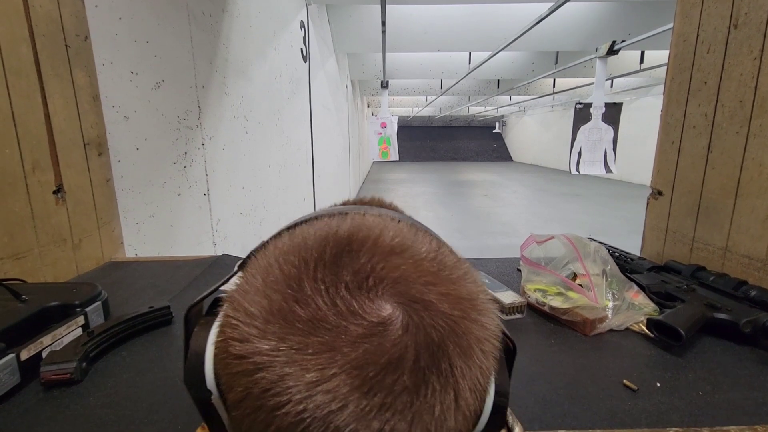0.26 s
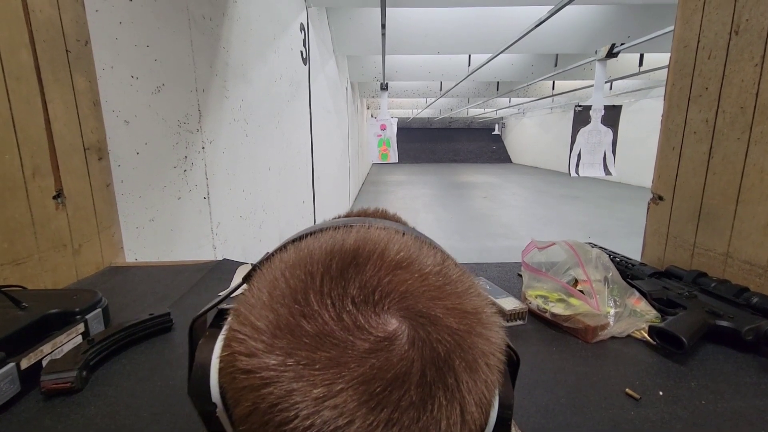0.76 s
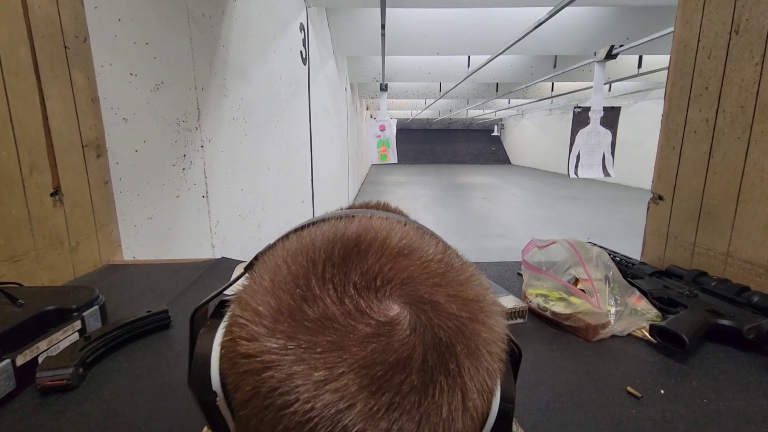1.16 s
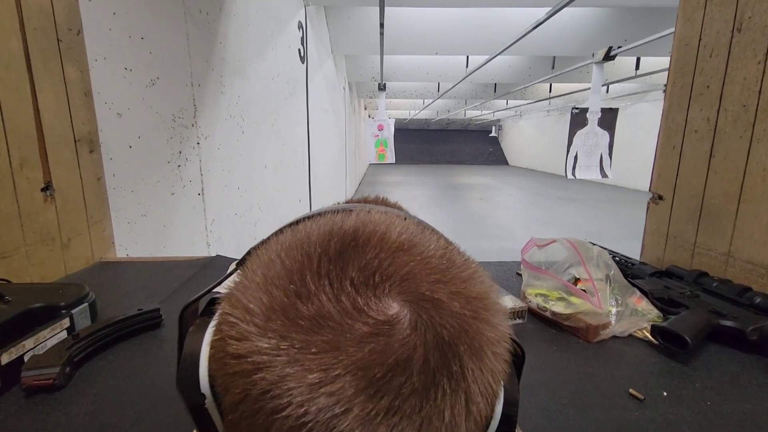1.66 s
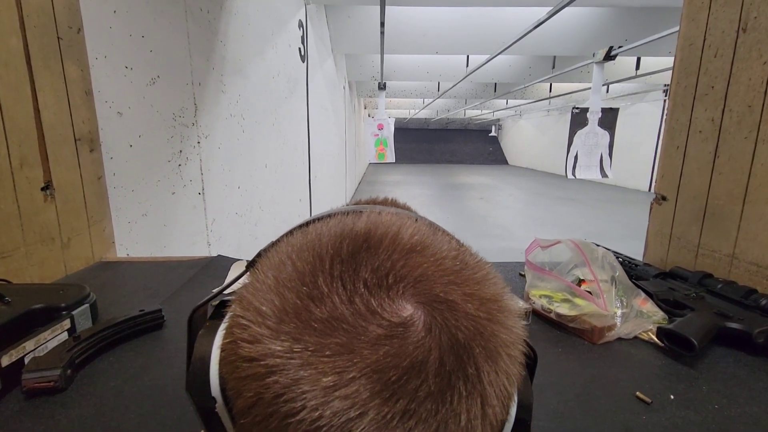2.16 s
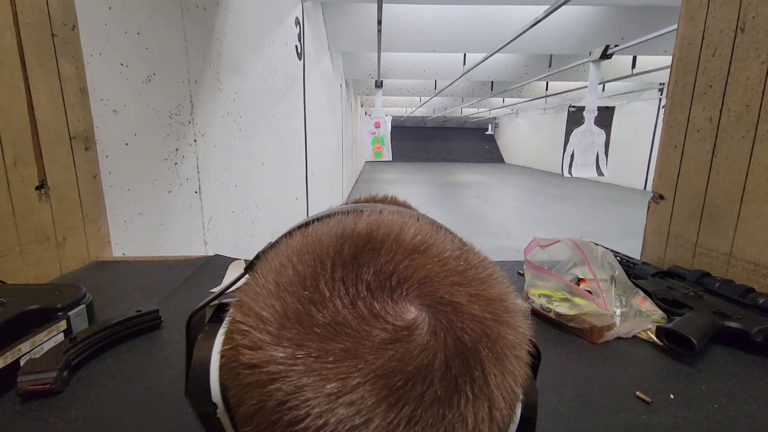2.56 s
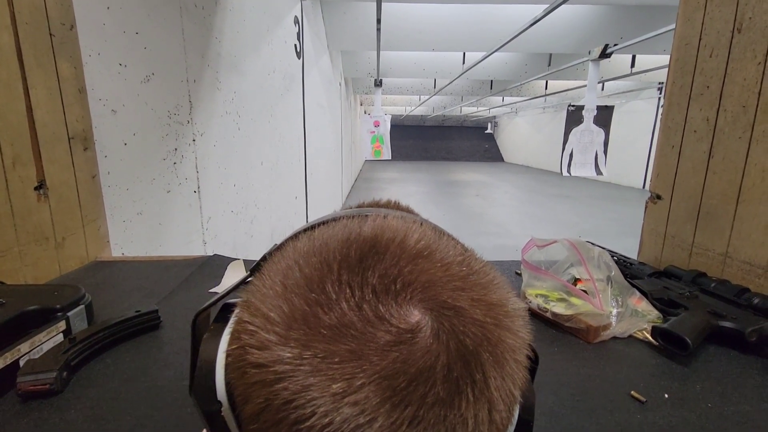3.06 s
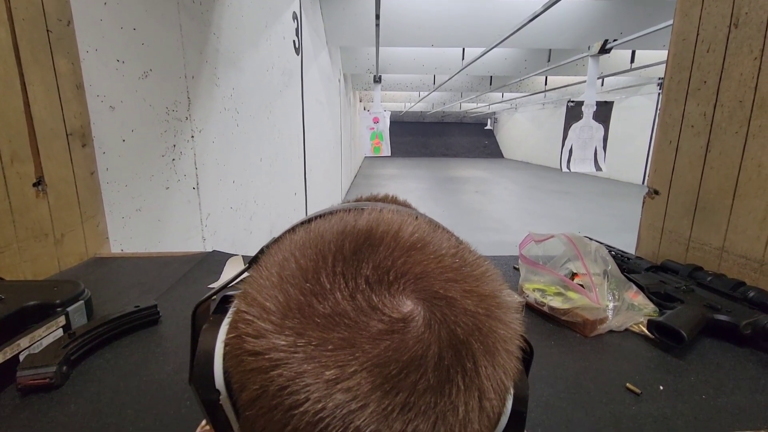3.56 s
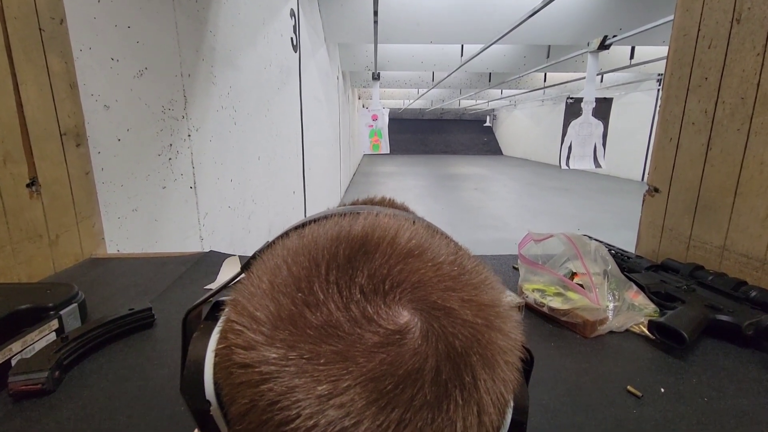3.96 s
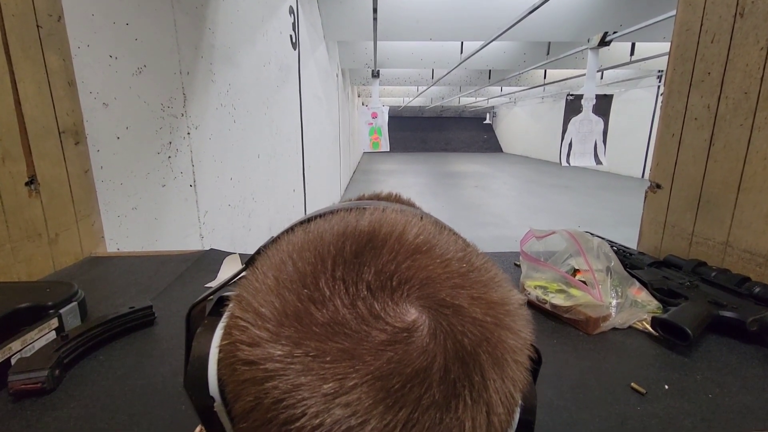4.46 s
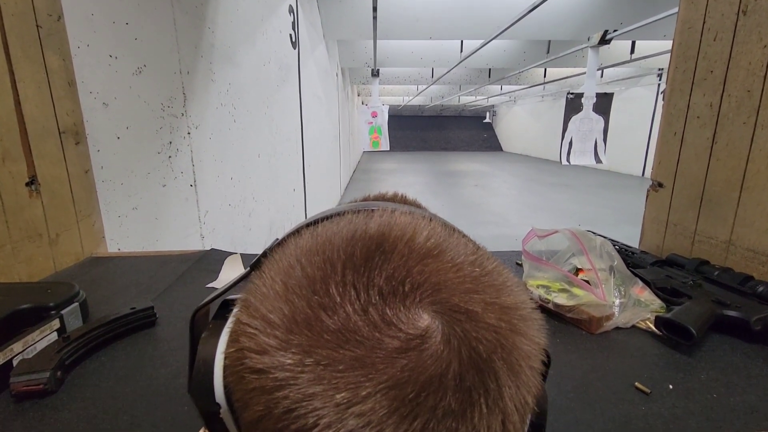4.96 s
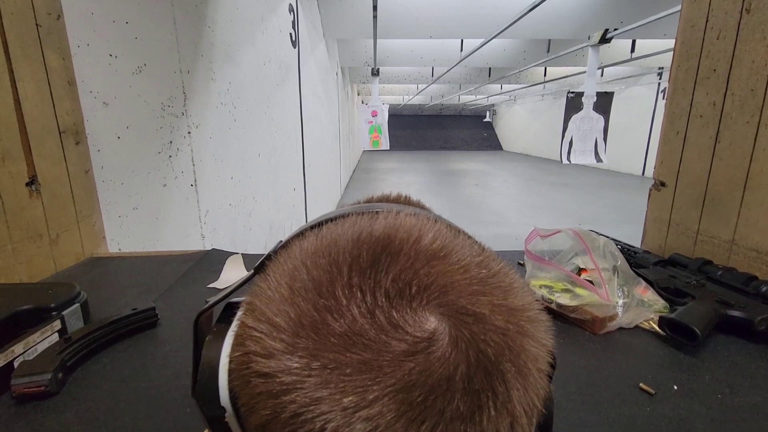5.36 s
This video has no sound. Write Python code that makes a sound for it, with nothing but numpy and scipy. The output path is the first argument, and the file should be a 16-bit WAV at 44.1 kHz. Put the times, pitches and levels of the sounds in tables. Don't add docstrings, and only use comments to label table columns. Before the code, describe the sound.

Over a fading blast's reverberation and steady fan rumble, three more gunshots thunder from neighbouring lanes, then light spent casings clink on a bench.

```python
import sys
import numpy as np
from scipy import signal
from scipy.fft import rfft, irfft, next_fast_len
from scipy.io import wavfile
from scipy.ndimage import uniform_filter1d, map_coordinates

SR = 44100
rng = np.random.default_rng(int(sys.argv[2]) if len(sys.argv) > 2 else 0)


def output_pcm(signal):
    pcm = np.clip(np.atleast_2d(signal).T, -1, 1) * 32767
    wavfile.write(sys.argv[1], SR, np.round(pcm).astype(np.int16))


def gain_from_db(level_db):
    decades = np.asarray(level_db, float) / 20
    return 10 ** decades


N = 247533
t = np.arange(N) / SR

# t/s, blast level/dB, room mode drive/dB, baffle drive/dB, near lane [bool]
SHOTS = [
    (-.412, 5, 1.6, -1.5, True),
    (2.61, 10, 1, 1.6, False),
    (4.267, 9, -1.5, -4.5, False),
    (4.648, 2.36, -0.5, -4.8, True),
]
# f/Hz, density/dB per Hz
BLAST_SPECTRUM = [(53, -49), (90, -7.5), (114, -8.5), (158, -5.5), (223, -5), (374, -2), (714, -4),
                  (1810, -9), (2010, -12), (7670, -23), (11100, -25), (14000, -18), (15600, -16)]
# f/Hz, t60/s
HALL_T60 = [(120, 0.66), (300, 0.87), (1000, 0.74), (3000, 0.68), (5000, 0.67), (8000, 0.69), (12000, 0.5),
            (15000, 0.35)]
# f/Hz, density/dB per Hz
LATE_SPECTRUM = [(76, -50.5), (130, -5), (282, -15.5), (365, -6), (403, -8), (446, -10.5), (566, -3),
                 (858, -7.5), (1250, -8.5), (6380, -19.5), (10300, -53), (12500, -40), (15000, -72)]
# f/Hz, t60/s
LANES_T60 = [(150, 0.65), (500, 4.09), (1500, 3.3), (3000, 2.23), (5000, 1.785), (8000, 1.28), (13000, .8)]
RISE_S = (0.043, 0.0094)
HIGHS_SLOWER = 1.77
FILL_S = (0.16, 0.085)
BLOOM_DB = (-2, -1)
LATE_DB = (-31, -32.5)
BRIGHT_DB = (1.7, 4)
BAND_DB = (1.5, 5)
# t/s, level/dB, width/s, signed scale
THUMPS = [
    (2.642, -12, 0.0066, 1),
    (2.6432, -19, 0.00091, -1),
    (4.297, -12.5, 0.0049, 1),
    (4.2982, -11, 0.0002, -0.87),
    (4.2991, -4, 0.00053, -1),
    (4.65, -13.5, 0.0061, 0.67),
]
# f/Hz, level/dB
PARTITION = [(620, -5), (860, -6.5), (1400, -5), (2300, -7.5), (5000, -13.5)]
# f/Hz, t60/s, level/dB from far lane, from near lane, from the shot already ringing
ROOM_MODES = [(42, 2.2, -19.5, -33, -31), (61.8, 2.34, -9, -6.5, -16.5), (77.3, 3.4, -8, -21, -20),
              (88.3, 3.09, -11, -18, -26.5), (153.5, 0.95, -9.5, -14.5, -16),
              (177.2, 0.97, -17, -36.5, -36)]
LEAD_S = 0.0003
# f/Hz, t60/s, level/dB from far lane, from near lane
BAFFLES = [(273.3, 1.38, 13.5, 14.5), (327.7, 1.5, 13, 20.5), (345.3, 1.2, 6, 18), (381, 2.8, 2.5, -17.5),
           (538, 3.6, 2, -1.5), (563, 3.76, -3, -0.5), (623, 7.8, -11.5, -11.5), (803, 5, -3, -4.5),
           (940, 1.6, -11, -5), (1080, 5.9, -7, -11.5), (1323, 4.93, -9, -5), (1330, 5.7, -11, -25.5)]
# t/s, scatter level/dB, ring level/dB, bench knock level/dB
CASES = [
    (1.172, -95, -99, -69),
    (3.365, -76.5, -66, -86.5),
    (5.389, -50, -45.5, -61),
    (5.502, -51, -45, -51),
    (5.525, -45.5, -49, -49.5),
]
# delay/s, scatter and knock loss/dB, ring loss/dB
RATTLE = [
    (0, -7.5, 17),
    (.006, 5.5, -3),
    (.017, 12, 12),
]
# f/Hz, level/dB, t60/s
BRASS = [(12320, -5.5, 0.38), (12380, 1, 0.28), (5760, 4.5, .03), (14000, -6, .03)]
# f/Hz, width/Hz, level/dB
BENCH = [(1700, 900, 10), (2900, 800, 22.5), (4380, 1200, 5), (5700, 730, -18)]
# f/Hz, density/dB per Hz
AIR_SPECTRUM = [(12, -27.5), (20, -8.5), (74, -2.5), (98, -7.5), (157, -13.5), (181, -24.5), (334, -22.5),
                (454, -30), (634, -23.5), (689, -30.5), (963, -32.5), (2860, -39.5), (10900, -63),
                (13600, -49), (15700, -58)]
# f/Hz, level/dB
FAN_TONES = [(532.9, -61), (624.5, -64), (753.7, -69.5), (1061, -90.5), (1330, -92)]
# f/Hz, level/dB
WHINE = [(12800, -89), (13280, -88.5), (14400, -94)]
FLICKER_HZ = 120
# f/Hz, left-right correlation [-1..1, negative = opposed]
ALIKE = [(60, .82), (130, .5), (420, .5), (650, -.1), (1100, -.45), (1700, -.35), (2700, -.05), (6000, 0),
         (7500, .25), (12000, .2)]
# f/Hz, left minus right/dB
LEAN = [(100, 1), (1200, -.4), (2200, -3.4), (5500, -4.2), (7500, 0)]


def unit(x):
    return x / np.sqrt(np.mean(x ** 2) + 1e-20)


def along(points, hz):
    f, v = np.transpose(points)
    return np.interp(np.log(hz + 1), np.log(f + 1), v)


def filtered(x, response):
    m = next_fast_len(N + SR // 2)
    return irfft(rfft(x, m) * response(np.fft.rfftfreq(m, 1 / SR)), m)[..., :N]


def wobble(rate_hz):
    return map_coordinates(rng.standard_normal(int(N * rate_hz / SR) + 4), [t * rate_hz])


def port_angle(hz):
    return np.arccos(np.clip(along(ALIKE, hz), -1, 1)) / 2


def diffuse(spectrum):
    def shape(hz):
        angle = port_angle(hz)
        return gain_from_db(along(spectrum, hz)) * [np.cos(angle), np.sin(angle)]

    def lean(hz):
        return gain_from_db(along(LEAN, hz) * [[.5], [-.5]])

    mid, side = filtered(rng.standard_normal((2, N)), shape)
    return unit(filtered(np.array([mid + side, mid - side]), lean))


def fuzzy(hz, rate_hz):
    apart = port_angle(hz) * np.array([[1], [-1]])
    envelope = 0.75 + 0.72 * (wobble(rate_hz) + 1j * wobble(rate_hz))
    return np.real(envelope * np.exp(2j * np.pi * hz * t + 1j * apart))


def dying(x, start_s, t60s, hold_s, patchy_db):
    hz, s, z = signal.stft(x, SR, nperseg=512)
    age = np.maximum(s - start_s, 0)
    filling = hold_s / (1 + hz[:, None] / 4000)
    fall = gain_from_db(-60 * age ** 2 / (age + filling) / along(t60s, hz)[:, None])
    clumps = uniform_filter1d(rng.standard_normal(fall.shape), size=3, axis=0)
    clumps = uniform_filter1d(clumps, size=6, axis=1)
    return signal.istft(z * fall * gain_from_db(patchy_db * unit(clumps)), SR, nperseg=512)[1][:, :N]


def swell(start_s, rise_s, depth_db=40):
    u = np.clip((t - start_s) / rise_s, 0, 1)
    return (t > start_s) * gain_from_db(-depth_db * (1 - u) ** 2.25)


def blasts():
    out = np.zeros((2, N))
    for s, db, _, _, lane in SHOTS:
        def late_color(hz):
            tilt_db = BRIGHT_DB[lane] * np.log2(hz / 1000 + 0.053)
            band_db = BAND_DB[lane] * np.exp(-np.log2(hz / 3000 + 0.01) ** 2 / 0.05)
            return gain_from_db(tilt_db + band_db)

        age = np.maximum(t - s, 0)
        lumps = gain_from_db(1.3 * wobble(45) * np.exp(-age / .25))
        late = filtered(diffuse(LATE_SPECTRUM), late_color)
        wash = lumps * dying(diffuse(BLAST_SPECTRUM), s, HALL_T60, hold_s=0.084, patchy_db=1.07)
        wash += gain_from_db(LATE_DB[lane]) * dying(late, s, LANES_T60, hold_s=0.0067, patchy_db=1.5)
        low = filtered(wash, lambda hz: 1 / (1 + (hz / 600) ** 4))
        high = filtered(wash, lambda hz: 1 - 1 / (1 + (hz / 4000) ** 4))
        empty = np.exp(-age / FILL_S[lane])
        bloom = gain_from_db(BLOOM_DB[lane]) * (1 - 0.92 * empty)
        mid = (wash - low - high) * (1 - 0.94 * empty)
        direct = (low * bloom + mid) * swell(s, RISE_S[lane])
        reflected = high * swell(s, HIGHS_SLOWER * RISE_S[lane], depth_db=54)
        out += gain_from_db(db) * (direct + reflected)
    return out


def thumps():
    out = np.zeros((2, N))
    for s, db, width_s, sign in THUMPS:
        u = (t - s + np.array([[.1], [-.1]]) * width_s) / width_s
        out += sign * gain_from_db(db) * (1 - 2 * u ** 2) * np.exp(-u ** 2)
    return out


def partition():
    out = np.zeros(N)
    for s, _, _, _, near in SHOTS:
        if near:
            continue
        fall = gain_from_db(-60 * np.maximum(t - s - .025, 0) / 0.043)
        shake = swell(s + .008, 0.027, depth_db=23) * fall
        for hz, db in PARTITION:
            out += shake * gain_from_db(db - 11.5) * np.sin(2 * np.pi * hz * t + rng.uniform(0, 4.6))
    return out


def boom():
    out = np.zeros((2, N))
    lead_s = LEAD_S * np.array([[.5], [-.5]])
    for k, (hz, t60_s, far_db, near_db, earlier_db) in enumerate(ROOM_MODES):
        for s, _, drive_db, _, near in SHOTS:
            level_db = drive_db + (earlier_db if s < 0 else near_db if near else far_db)
            first = max(round(s * SR), 0)
            u = np.maximum(t[first:] - s, 0)
            swing = np.sin(2 * np.pi * hz * (u + lead_s))
            build = 1 - np.exp(-u * (hz / 77) / 0.31)
            out[:, first:] += (-1) ** k * gain_from_db(level_db - 60 * u / t60_s) * build * swing
    return out * gain_from_db([[.7], [-.7]])


def baffles():
    out = np.zeros((2, N))
    kicks = [(np.maximum(t - s, 0), gain_from_db(db) * swell(s, 0.067), lane) for s, _, _, db, lane in SHOTS]
    for hz, t60_s, *levels_db in BAFFLES:
        ring = sum(gain_from_db(levels_db[lane] - 60 * age / t60_s) * kick for age, kick, lane in kicks)
        out += gain_from_db(-35.0) * ring * fuzzy(hz, 9.7)
    return out


def bench_response(f):
    modes = sum(gain_from_db(g) * 1j * f * w / (c * c - f * f + 1j * f * w) for c, w, g in BENCH)
    return modes / (1 + (f / 7000) ** 4)


def cases():
    bright, knock = np.zeros((2, N + SR)), np.zeros((2, N + SR))
    u = np.arange(SR // 2) / SR
    tumble = np.pad(0.97 + 0.13 * wobble(60), (0, SR))
    turn_rad = np.pad(1.2 * wobble(150), (0, SR))
    click = gain_from_db(-60 * u / .01) * (1 - np.exp(-u / .001))
    scatter = click + 0.58 * gain_from_db(-60 * u / .2)
    thud = .4 * click + 0.31 * gain_from_db(-60 * u / 0.38) * (1 - np.exp(-u / .008))
    for s, db, ring_db, knock_db in CASES:
        for delay_s, loss_db, dull_db in RATTLE:
            first = round((s + delay_s) * SR)
            at = slice(first, first + len(u))
            ring = 0
            for hz, g, t60_s in BRASS:
                phase = 2 * np.pi * hz * u + rng.uniform(0, 5) + turn_rad[at]
                ring = ring + gain_from_db(g - 60 * u / t60_s) * np.sin(phase)
            noise = rng.standard_normal(len(u)) + rng.standard_normal((2, len(u)))
            bright[:, at] += gain_from_db(db - loss_db) * noise * scatter
            bright[:, at] += gain_from_db(ring_db - dull_db) * tumble[at] * ring
            knock[:, at] += gain_from_db(knock_db - loss_db) * noise * thud
    bright = filtered(bright[:, :N], lambda hz: 1 / (1 + (5000 / (hz + 1)) ** 6))
    return bright + filtered(knock[:, :N], bench_response)


def ventilation():
    tones = sum(gain_from_db(db) * fuzzy(hz, 12) for hz, db in FAN_TONES)
    air = gain_from_db(-44.0 + 0.28 * wobble(15.0)) * diffuse(AIR_SPECTRUM)
    side = filtered(air[0] - air[1], lambda hz: 1 - 1 / (1 + (hz / 7000) ** 8))
    return air - .45 * side * np.array([[1], [-1]]) + tones


def lamps():
    pulse = .3 + np.cos(np.pi * FLICKER_HZ * t) ** 8
    fizz = filtered(rng.standard_normal(N), lambda hz: np.exp(-((hz - 13600) / 1300) ** 2))
    whine = sum(gain_from_db(db) * np.sin(2 * np.pi * hz * t + 1.5 * wobble(40)) for hz, db in WHINE)
    return unit(pulse) * (gain_from_db(-81.5) * unit(fizz) + whine)


def scene():
    shots = blasts() + thumps() + partition() + boom() + baffles()
    return shots + cases() + ventilation() + lamps()


def follower(power, seconds):
    keep = np.exp(-1 / (seconds * SR))
    return signal.lfilter([1 - keep], [1, -keep], power, zi=[power[:2000].mean()])[0]


def top_cut(x):
    return signal.sosfilt(signal.butter(12, 15790, fs=SR, output="sos"), x)


def record(dry):
    power = np.mean(dry ** 2, axis=0)
    loud = np.maximum(follower(power, 0.0017), follower(power, 0.035))
    loud += gain_from_db(-16.5) * follower(power, 1.0)
    ducked = dry * (1 + loud / gain_from_db(-7.5) ** 2) ** -.45
    rounded = ducked / (1 + np.abs(ducked / .9) ** 4) ** (1 / 4)
    mix = filtered(rounded, lambda hz: np.clip((15820 - hz) / 120, 0, 1))
    return top_cut(mix)


dry = scene()
out = record(dry)
output_pcm(out)
```